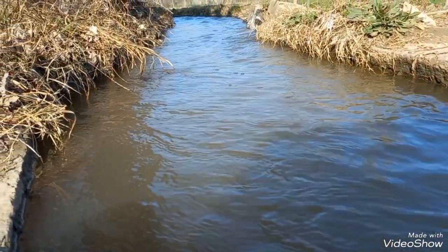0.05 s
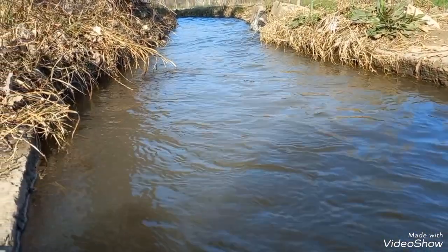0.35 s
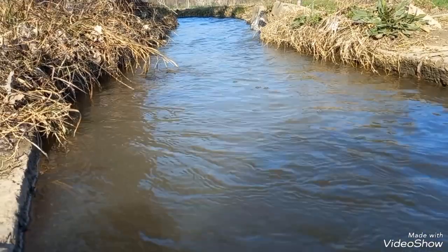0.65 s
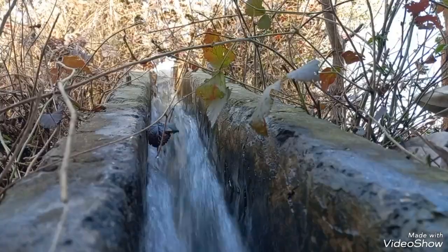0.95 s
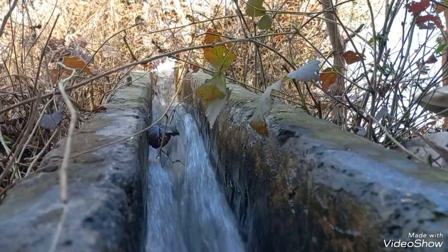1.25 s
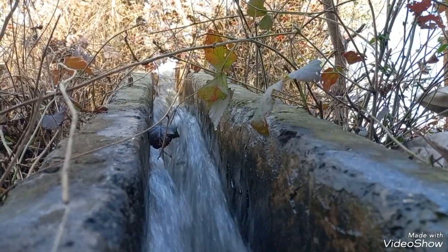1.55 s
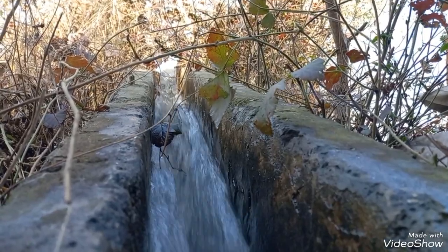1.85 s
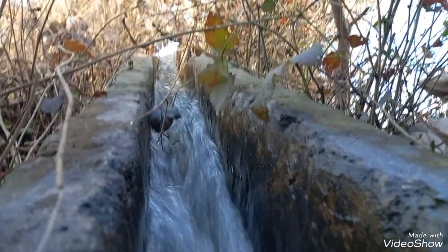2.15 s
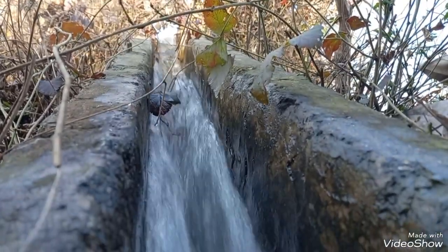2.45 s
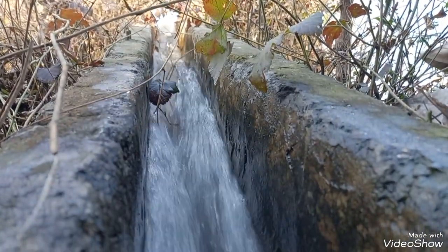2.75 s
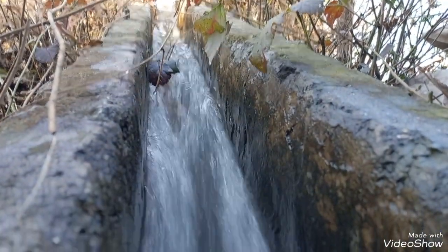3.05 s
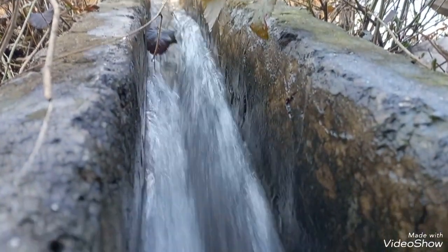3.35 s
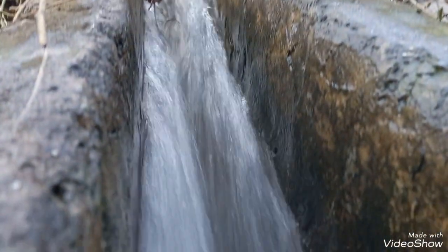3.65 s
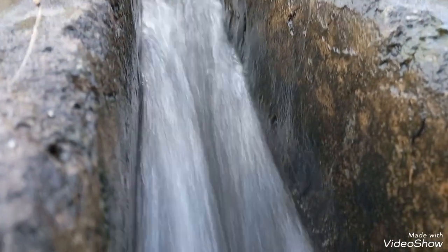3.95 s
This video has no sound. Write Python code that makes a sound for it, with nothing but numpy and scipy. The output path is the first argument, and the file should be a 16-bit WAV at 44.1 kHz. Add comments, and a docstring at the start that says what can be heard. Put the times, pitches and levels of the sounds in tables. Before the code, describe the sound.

Flowing water outdoors, first a soft wash with wavelets slapping the bank and single plops. After a brief silence comes a loud, steady, close rush down a stone chute, with churning foam, small gulps and spitting drops.

```python
"""Water laps and gurgles along an open channel: wavelets slap the bank and single bubbles ring.
It fades out for an instant; then, close by, water roars down a narrow stone chute.
The roar is churning foam and countless ringing bubbles, with gulps of swallowed air and drops
spitting on the stone. Towards the end the microphone leans in between the walls and the spray dulls."""
import sys
import numpy as np
from scipy import signal
from scipy.fft import rfft, irfft, next_fast_len
from scipy.io import wavfile
from scipy.ndimage import uniform_filter1d, map_coordinates

SR = 44100
rng = np.random.default_rng(int(sys.argv[2]) if len(sys.argv) > 2 else 0)


def persist_wave(psi):
    """Save psi, clipped to +-1, as 16-bit WAV."""
    counts = np.round(np.clip(psi, -1, 1) * 32767).astype(np.int16)
    wavfile.write(sys.argv[1], SR, np.atleast_2d(counts).T)


N = 176400

# Stereo image from above the chute walls
ABOVE_COHERENCE = [(50, 0.94), (600, 0.96), (1100, .83), (1350, 0.59), (1700, 0.03), (2500, 0.21),
                   (3300, -.05), (6500, -0.025), (8200, 0.87), (12500, .8), (15000, 0.36)]  # (f/Hz, left-right coherence)
ABOVE_BALANCE = [(60, -8), (83, -1), (110, 6), (160, -4.5), (220, 2), (300, -4), (420, -1), (580, -2),
                 (810, 0.0), (1120, 0.0), (1540, -2.0), (2140, -4.5), (2960, -4.5), (4090, -9.5),
                 (5660, -12), (7830, 5.5), (10800, -9.5), (15000, -0.5)]  # (f/Hz, left over right/dB)
# Stereo image at the open channel
CHANNEL_COHERENCE = [(50, .75), (230, .95), (750, 0.62), (2400, .6), (5800, 0.32), (7800, .84),
                     (15000, 0.88)]  # (f/Hz, left-right coherence)
CHANNEL_BALANCE = [(60, 0.5), (99, 0.5), (160, -2), (270, 2.5), (450, -2), (740, -0.5), (1220, -2),
                   (2010, -4.5), (3330, -2), (5500, -4), (9080, -5.0), (15000, -6)]  # (f/Hz, left over right/dB)
CHANNEL_LEAD = [(50, 0), (400, -.3), (950, -1.1), (1250, -2.8), (2100, -4.2), (2900, -6.2), (4400, -9.3),
                (7000, -12.57), (16000, -12.57)]  # (f/Hz, phase lead of the left/rad)


def chute():
    """Fast water close by: foam, bubbles and spray, heard from above the walls, then between them."""
    roar_level = [(1.0, -17), (1.22, -17.5), (1.47, -18.8), (1.62, -17), (1.9, -19), (2.04, -18),
                  (2.14, -21), (2.3, -18.5), (2.7, -19), (3.3, -18), (4, -19)]  # the whole rush (t/s, level/dB)
    treble_boost = [(1, -1.4), (1.7, -.5), (2.2, 1.6), (2.6, 2), (3.1, -1), (3.5, -1.5), (4, -2)]  # extra gain above 5 kHz (t/s, level/dB)
    above_colour = [(15, -71), (25, -48), (47, -26), (72, -11), (148, -9), (200, -4), (248, -5), (324, -11),
                    (500, -6.5), (587, -1.5), (881, -2.5), (1040, -1.5), (1320, -3.5), (2390, -6.5),
                    (2660, -9), (3390, -12.5), (5370, -8.5), (7830, -27), (12400, -15), (15800, -27)]  # spectrum above the walls (f/Hz, level/dB)
    # Spectrum and stereo image between the walls
    between_colour = [(20, -60), (35, -36), (48, -23), (62, -15), (96, -8), (130, -8), (157, -9), (216, -2),
                      (316, -10), (414, -7.5), (572, -4), (834, -2.5), (1040, -1.5), (1300, -3.5),
                      (1730, -6), (2260, -6), (3220, -13), (4650, -9), (5700, -12.5), (7030, -19.5),
                      (8050, -27), (12100, -19.5), (13400, -20.5), (15800, -28)]  # (f/Hz, level/dB)
    between_coherence = [(50, 0.91), (600, 0.96), (1200, 0.73), (1550, -0.093), (2400, .24), (3300, -.05),
                         (7000, 0.045), (7900, .55), (9500, .42), (11700, .7), (15000, .25)]  # (f/Hz, left-right coherence)
    between_balance = [(80, 2), (210, -1), (600, -.3), (1100, 1.7), (2000, -4.5), (3300, -3), (4500, -13.5),
                       (5500, -9.5), (7100, 8.5), (8200, .3), (11500, 0.5), (15500, 3)]  # (f/Hz, left over right/dB)
    water = foam(patchy_db=1.5)
    water += amp(-3) * bubbles(low_hz=349.8, high_hz=4494, cycles=22, rise=.078, spread_db=3, count=7000)
    fizz = bubbles(low_hz=2470, high_hz=14860, cycles=51, rise=.04, spread_db=2.5, count=9000)
    water += amp(-5.5) * fizz
    water += amp(-1) * spray(low_hz=8000, burst_s=.00055, spread_db=7.5, count=3000)
    water *= amp(.17 * wobble(18) + .55 * wobble(70))  # slight, quick surges
    above = placed(water, above_colour, ABOVE_COHERENCE, ABOVE_BALANCE)
    between = placed(water, between_colour, between_coherence, between_balance)
    lean_in = curve([(2.7, 0), (3.75, 1)])
    at_mic = (1 - lean_in) * above + lean_in * between
    treble = filtered(at_mic, lambda hz: 1 - lowpass(hz, 5000))
    return amp(curve(roar_level)) * (at_mic + (amp(curve(treble_boost)) - 1) * treble)


def gulps():
    """A pocket of air swallowed by the chute rings for a moment as a cloud of like bubbles."""
    air_pockets = [(1.075, 2000, -28), (1.249, 910, -21.5), (1.372, 218, -30), (1.554, 960, -21),
                   (1.62, 635, -22), (1.662, 230, -36), (2.063, 2080, -25), (2.32, 930, -34),
                   (2.521, 800, -18.5), (2.767, 268, -28.5), (3.444, 960, -21), (3.553, 2270, -24.5),
                   (3.6, 2200, -32), (3.755, 940, -23), (3.801, 224, -25)]  # (t/s, f/Hz, level/dB)
    relative_width, half_length_s = .19, .0094  # Gaussian spreads in pitch and in time
    t, out = np.arange(N) / SR, np.zeros(N)
    for s, hz, db in air_pockets:
        noise = rng.standard_normal(N)
        cloud = filtered(noise, lambda f: np.exp(-.5 * ((f / hz - 1) / relative_width) ** 2))
        swell = np.exp(-.5 * ((t - s) / half_length_s) ** 2)
        gulp = swell * cloud
        out += amp(db) * gulp * np.linalg.norm(swell) / np.linalg.norm(gulp)
    return out


def spits():
    """Single drops burst on the stone wall near the microphone."""
    drops = [(1.83, -14, 0.019), (2.034, -25, .012), (2.163, -18, .022), (2.233, -19, 0.032),
             (3.232, -21, .014), (3.43, -25, .012)]  # (t/s, level/dB, decay t60/s)
    drop_colour = [(1000, -25), (5000, -12), (8000, -12), (12300, 0), (16000, -14)]  # spectrum of a burst (f/Hz, level/dB)
    hiss = placed(foam(patchy_db=5), drop_colour, ABOVE_COHERENCE, ABOVE_BALANCE)
    return splash_envelope(drops, attack_s=.00084) * hiss


def channel():
    """Slow water in the open: bubbles and ticks over a soft wash, with a fine, fading fizz on top."""
    gurgle_level = [(0, -30.5), (.28, -30.5), (.4, -32.5), (.52, -34.5), (.6, -35), (.8, -36)]  # the water below 1.5 kHz (t/s, level/dB)
    ripple_level = [(0, -35.5), (.27, -35), (.35, -39), (.5, -36), (.6, -41.5), (.73, -38), (.8, -40.5)]  # the water from 1.5 to 8 kHz (t/s, relative level/dB)
    water_colour = [(20, -55), (35, -36), (60, -17), (100, -11.5), (141, -16), (225, -3.5), (290, -7.5),
                    (392, -3), (471, -7.5), (596, -6), (775, -10), (950, -7.5), (1250, -11), (1750, -11.5),
                    (2200, -6), (2550, -5), (2870, -11.5), (3400, -11.5), (4980, -20), (6600, -17.5),
                    (8200, -28), (9800, -30.5), (12000, -24), (14000, -27), (15800, -30)]  # spectrum before the bands are levelled (f/Hz, level/dB)
    water = foam(patchy_db=1.7)
    water += amp(-5.5) * bubbles(low_hz=297, high_hz=6940, cycles=32, rise=.094, spread_db=2.5,
                                 count=4000)
    water += amp(-1) * spray(low_hz=5000, burst_s=.002, spread_db=4, count=1200)
    water = placed(water, water_colour, CHANNEL_COHERENCE, CHANNEL_BALANCE, CHANNEL_LEAD)
    low = filtered(water, lambda hz: lowpass(hz, 1500))
    high = filtered(water, lambda hz: 1 - lowpass(hz, 8000))
    gurgle = amp(curve(gurgle_level)) * unit(low)
    ripple = amp(curve(ripple_level) + 2.5) * unit(water - low - high)
    fizz = amp(-40 - 8 * np.arange(N) / SR) * unit(high)  # falls 8 dB a second
    return gurgle + ripple + fizz


def slaps():
    """Each wavelet breaks on the channel bank in a short splash."""
    wavelets = [(.088, -25.5, 0.044), (.147, -28, .04), (.215, -33, .06), (.224, -24.5, 0.11),
                (.268, -26, .05), (.348, -32, 0.027), (.367, -35, .025), (.453, -26.5, 0.038),
                (.474, -20.5, .025), (.491, -33, 0.027), (.616, -31, .04), (.625, -29, .03),
                (.664, -34, .03), (.776, -31.5, 0.076), (.803, -30, .03)]  # (t/s, level/dB, decay t60/s)
    splash_colour = [(400, -25), (1300, -3), (2800, 7.5), (4800, -8), (6400, 0), (9000, -15), (12000, -6),
                     (16000, -18)]  # spectrum of a splash (f/Hz, level/dB)
    wash = placed(foam(patchy_db=4.5), splash_colour, CHANNEL_COHERENCE, CHANNEL_BALANCE, CHANNEL_LEAD)
    return splash_envelope(wavelets, attack_s=.0015) * wash


def plops():
    """A large bubble in the channel rings briefly, its pitch rising as it surfaces."""
    large_bubbles = [(0.054, 2650, -22), (.188, 910, -20), (.191, 2540, -18), (.287, 600, -21),
                     (.298, 2370, -19.5), (.302, 3380, -26.5), (.307, 2030, -24), (0.393, 534, -20),
                     (.428, 676, -27), (0.509, 330, -18.5), (.628, 340, -23), (.663, 2480, -29),
                     (.697, 2550, -22)]  # (t/s, f/Hz, level/dB)
    t60_s, attack_s, rise_per_s = .047, .0021, 1
    t, out = np.arange(SR // 5) / SR, np.zeros(N)
    for s, hz, db in large_bubbles:
        phase = 2 * np.pi * hz * t * (1 + rise_per_s * t / 2) + .27 * wobble(270)[:len(t)]
        envelope = amp(db - 60 * t / t60_s) * (1 - np.exp(-t / attack_s))
        out[round(s * SR):][:len(t)] += envelope * np.sin(phase)
    return out * amp([[-1.5], [1.5]])  # a little to the right


def foam(patchy_db):
    """Churning foam: two white noises that swell in brief random patches of time and frequency."""
    spectra = signal.stft(rng.standard_normal((2, N)), nperseg=256)[2]
    patches = uniform_filter1d(rng.standard_normal(spectra.shape[1:]), size=7, axis=0)
    patches = uniform_filter1d(patches, size=6, axis=1)
    spectra *= amp(patchy_db * unit(patches))
    return unit(signal.istft(spectra, nperseg=256)[1][:, :N])


def bubbles(low_hz, high_hz, cycles, rise, spread_db, count):
    """Bubbles ring as damped rising tones: two streams, as strong per Hz as white noise of rms 1."""
    start, pitch, size, life, bearing = rng.random((count, 5)).T
    hz = (np.sqrt(low_hz) + pitch * (np.sqrt(high_hz) - np.sqrt(low_hz))) ** 2
    length = (cycles * (.5 + life) * SR / hz).astype(int) + 2
    gain = hz ** .75 * amp(-spread_db * np.log(size + .01))
    # All rings laid end to end: each sample has its bubble and its age
    bubble = np.repeat(np.arange(count), length)
    age = np.arange(len(bubble)) - np.repeat(np.cumsum(length) - length, length)
    progress = age / length[bubble]
    phase = 2 * np.pi * hz[bubble] * age / SR * (1 + rise * progress / 2)
    envelope = amp(-40 * progress) * (1 - np.exp(-20 * progress))
    tone = gain[bubble] * envelope * np.sin(phase)
    at = (start * N).astype(int)[bubble] + age
    shares = np.cos(2 * np.pi * bearing), np.sin(2 * np.pi * bearing)
    pair = np.array([np.bincount(at, tone * share[bubble], N)[:N] for share in shares])
    return unit(pair) * np.sqrt(2 * (high_hz - low_hz) / SR)


def spray(low_hz, burst_s, spread_db, count):
    """Droplets hit stone: two streams of tiny bursts of hiss."""
    start, size = rng.random((count, 2)).T
    hits = np.bincount((start * N).astype(int), amp(-2 * spread_db * np.log(size + .04)), N)
    power = signal.lfilter([1], [1, -np.exp(-1 / (burst_s * SR))], hits)
    bursts = unit(np.sqrt(power) * rng.standard_normal((2, N)))
    return filtered(bursts, lambda hz: hz ** 2 / (hz ** 2 + low_hz ** 2))


def splash_envelope(rows, attack_s):
    """A quick rise and a decay for each (t/s, level/dB, t60/s) row."""
    t = np.arange(N) / SR
    return sum(amp(db - 60 * np.maximum(t - s, 0) / t60) * np.clip((t - s) / attack_s, 0, 1)
               for s, db, t60 in rows)


def placed(pair, colour, coherence, balance, lead=None):
    """Two white streams become a coloured stereo sound at the microphone, its mid signal at rms 1."""
    def response(hz):
        angle = np.arccos(np.clip(along(coherence, hz), -1, 1)) / 2
        common, opposed = np.cos(angle), np.sin(angle)
        pan = amp(along(balance, hz) / 2) * np.exp(.5j * (along(lead, hz) if lead else 0))
        mix = np.array([[common * pan, opposed * pan], [common / pan, -opposed / pan]])
        return mix * amp(along(colour, hz)) / np.linalg.norm(mix.mean(0), axis=0)
    stereo = filtered(pair, response).sum(1)
    return stereo / np.sqrt(np.mean(stereo.mean(0) ** 2))


def amp(db):
    """Decibels to gain."""
    return 10 ** (np.asarray(db) / 20)


def unit(x):
    """x at rms 1."""
    return x / np.sqrt(np.mean(x ** 2) + 1e-20)


def along(points, hz):
    """(f/Hz, value) points joined on a log axis."""
    f, values = np.transpose(points)
    return np.interp(np.log(hz + 1), np.log(f + 1), values)


def curve(rows):
    """(t/s, value) points joined, one value per sample."""
    return np.interp(np.arange(N) / SR, *np.transpose(rows))


def wobble(rate):
    """A smooth random curve, rate knots a second."""
    return map_coordinates(rng.standard_normal(8192), [np.arange(N) * rate / SR], mode="wrap")


def lowpass(hz, corner_hz):
    """Gain of a steep low-pass."""
    return 1 / (1 + (hz / corner_hz) ** 8)


def filtered(x, response):
    """x through a complex frequency response."""
    size = next_fast_len(N + 8192)
    return irfft(rfft(x, size) * response(np.fft.rfftfreq(size, 1 / SR)), size)[..., :N]


def scene():
    """The open channel fades out; after an instant of silence the chute comes in close."""
    fade_s, silent_s, chute_s, full_s = .8, .882, .925, 1
    leaving = curve([(fade_s, 1), (silent_s, 0)])
    arriving = curve([(chute_s, .18), (full_s, 1)]) * (np.arange(N) / SR >= chute_s)
    return leaving * (channel() + slaps() + plops()) + arriving * (chute() + gulps() + spits())


def record(dry):
    """The recorder keeps nothing above its band limit."""
    top_hz, edge_hz = 16050, 200
    return filtered(dry, lambda hz: np.clip((top_hz - hz) / edge_hz + .5, 0, 1))


dry = scene()
out = record(dry)
persist_wave(out)
```